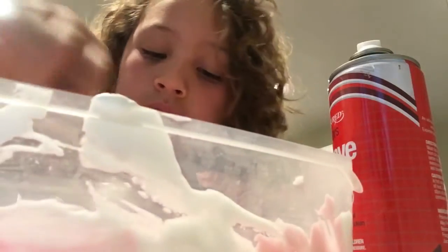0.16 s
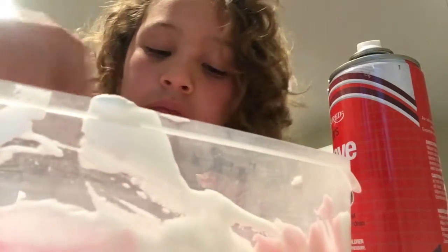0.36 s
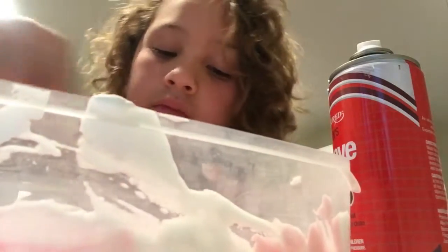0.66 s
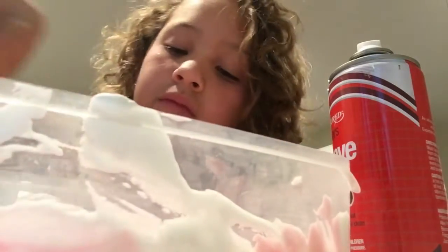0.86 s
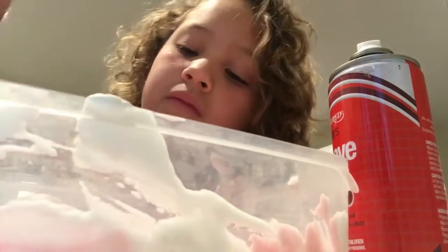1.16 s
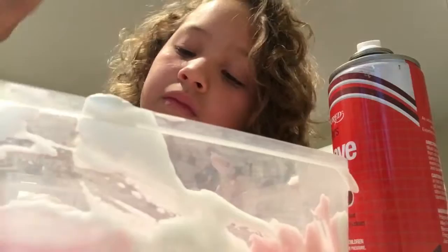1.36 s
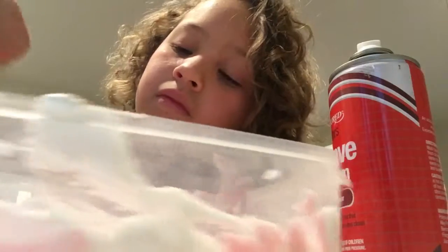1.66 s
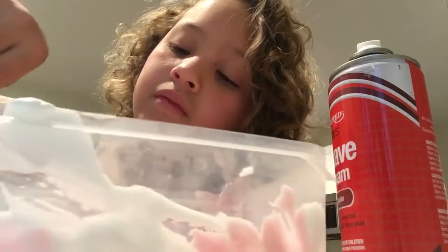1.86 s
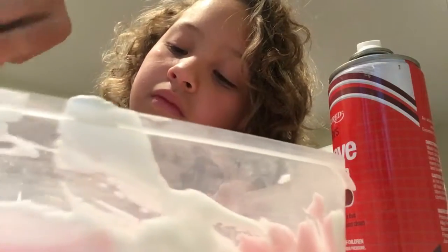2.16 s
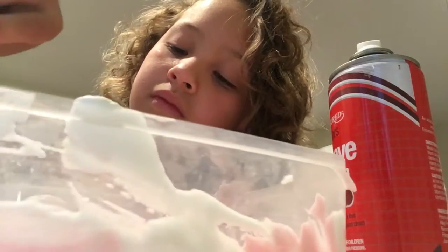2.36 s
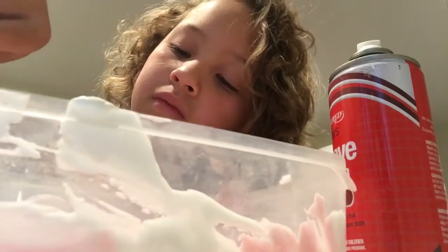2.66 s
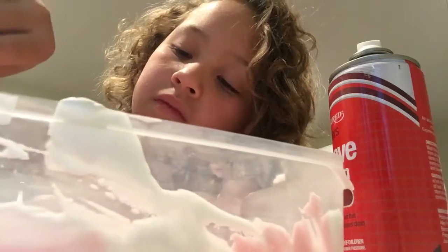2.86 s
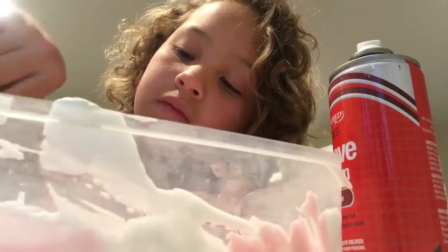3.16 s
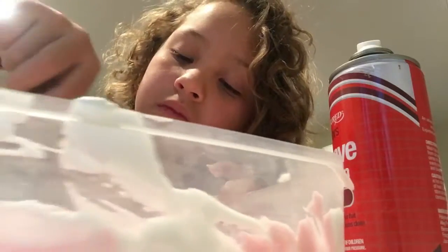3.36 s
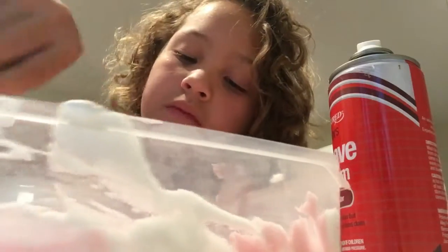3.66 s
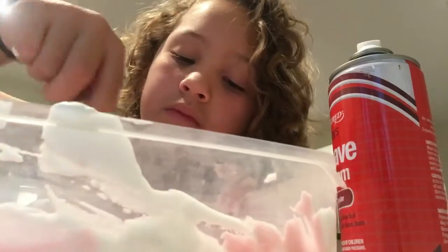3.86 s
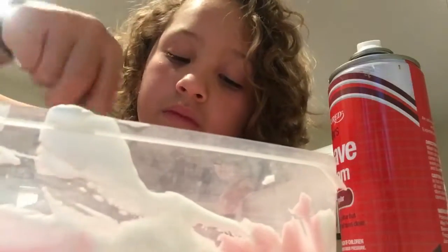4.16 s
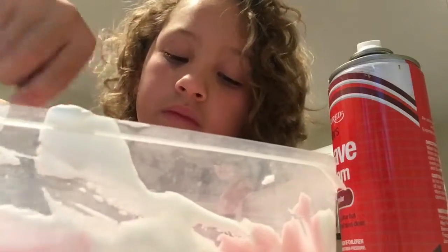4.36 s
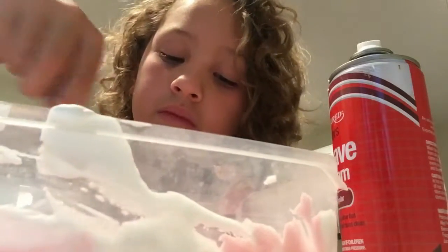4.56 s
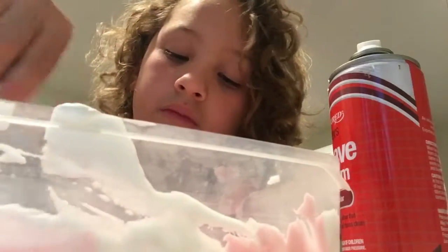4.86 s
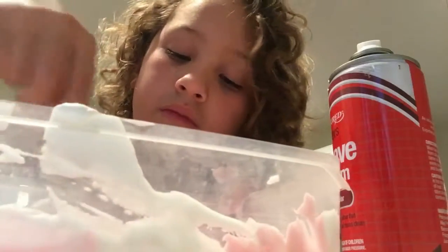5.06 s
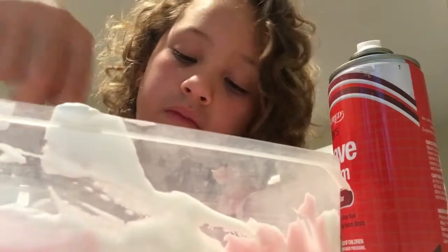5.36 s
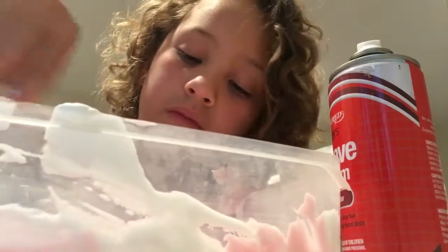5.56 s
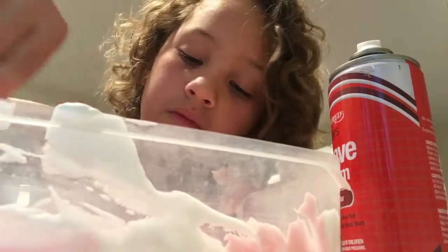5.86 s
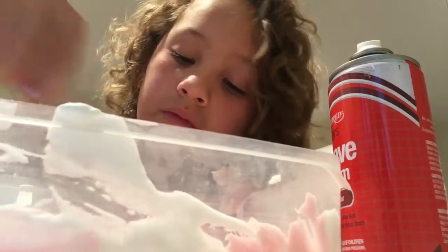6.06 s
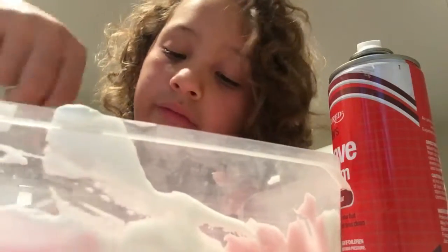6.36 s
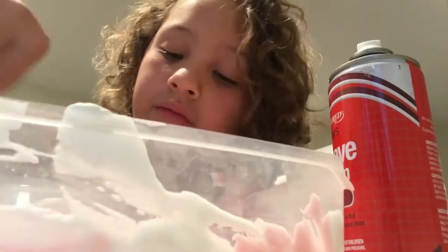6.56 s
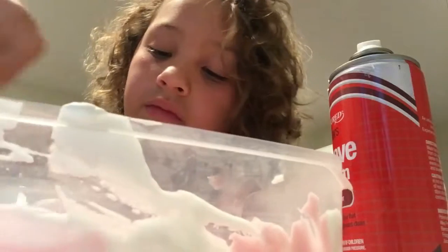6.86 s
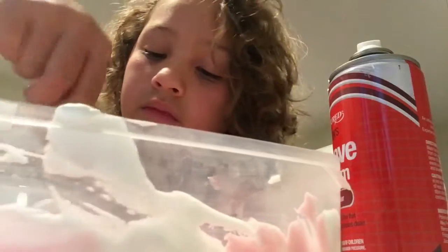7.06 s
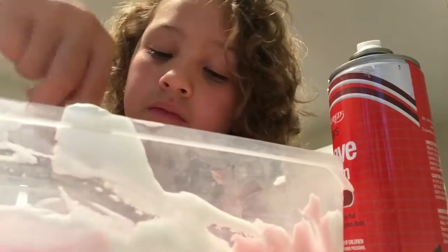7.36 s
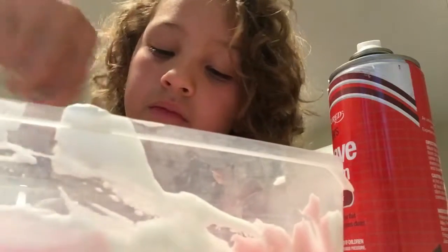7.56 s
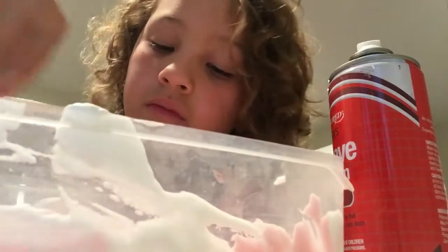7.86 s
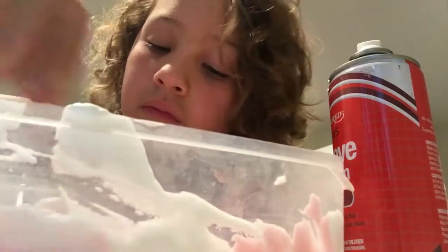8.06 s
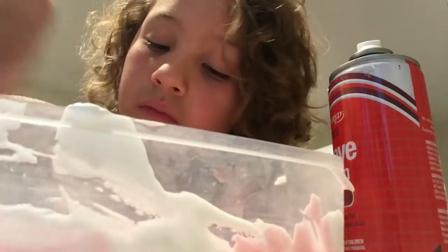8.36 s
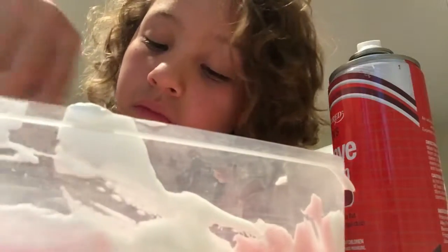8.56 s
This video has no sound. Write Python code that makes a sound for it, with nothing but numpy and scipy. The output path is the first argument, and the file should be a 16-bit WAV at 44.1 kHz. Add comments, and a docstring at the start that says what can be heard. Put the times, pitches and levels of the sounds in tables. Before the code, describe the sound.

A hard tool stirs sticky paste in a plastic tub, with irregular close taps, hollow knocks and small clicks.

```python
"""At a table in a small room, a hard tool stirs sticky paste in a plastic tub, right beside a phone. The tool
knocks and drags on the tub, whose walls, base and rim ring briefly while the table thumps. The paste ticks as
it tears. Behind it all are a low rumble of the room and a hiss that swells after hard blows."""
import sys
import numpy as np
from scipy import signal
from scipy.fft import rfft, irfft
from scipy.io import wavfile
from scipy.ndimage import uniform_filter1d

SR = 44100
rng = np.random.default_rng(int(sys.argv[2]) if len(sys.argv) > 2 else 0)


def int16_out(signal):
    """Quantize to a 16-bit WAV file."""
    q = np.round(np.clip(np.atleast_2d(signal).T, -1, 1) * 32767)
    wavfile.write(sys.argv[1], SR, q.astype(np.int16))


N = 383650

# Blows on the tub. Each row: start in seconds, peak of the wall in dB, table thump and edge ring
# in dB compared with the wall, favoured wall pitch in Hz.
BLOWS = [(0.052, -26, -17, -5, 516), (0.276, -13.5, -8, -13, 560), (0.365, -31.5, -17, -11.5, 595),
         (0.578, -24.5, -7.5, -14.5, 690), (0.653, -38.5, -5.5, -12, 630), (0.727, -33.5, -26, -12, 729),
         (0.912, -19.5, -15, -23.5, 490), (1.006, -23, -14, -27, 590), (1.036, -20.5, -22, -13, 704),
         (1.055, -30.5, -8, -29, 785), (1.198, -19, 3.5, -1.5, 560), (1.583, -3.5, -18.5, -30.5, 475),
         (1.637, -27.5, -16, -16.5, 640), (1.729, -25, -27, -28.5, 610), (2.528, -19.5, -7.5, -5.5, 510),
         (3.2, -20.5, -5.5, -30, 647), (3.482, -33.5, -3, -31, 586), (3.507, -22, -19, -31, 705),
         (3.651, -0.5, -19.5, -14.5, 660), (4.004, -21, -41, -25, 890), (4.097, -39.5, 4.5, -12, 690),
         (4.126, -30, -7, -15, 600), (4.153, -28.5, -10, -31, 580), (4.311, -27.5, -28, -0.5, 715),
         (4.329, -29.5, -35, -8, 805), (4.412, -34, -2.5, -20, 670), (4.522, -23.5, -2, -18, 554),
         (4.616, -27.5, -12, -19, 640), (4.665, -34, -16, -16, 587), (4.749, -28, -25, -10.5, 600),
         (4.782, -38, -1, -8.5, 487), (4.801, -26, 0, -13, 603), (4.84, -32.5, -7, -18, 585),
         (4.893, -31.5, -31, -11.5, 825), (4.915, -27.5, -25, -16, 613), (4.935, -20.5, -15.5, -5.5, 860),
         (5.057, -29, 3, -16.5, 520), (5.247, -25.5, -3, -15, 706), (5.359, -38.5, -4, -20, 676),
         (5.392, -31.5, -2.5, -21, 614), (5.433, -23, -12.5, -17.5, 597), (5.497, -24, -28, -4.5, 590),
         (5.564, -19, -8.5, -14.5, 490), (5.688, -28.5, -1, -15.5, 586), (5.764, -33, -22, -22, 590),
         (5.873, -29, -3.5, -13, 594), (6.043, -32, -1, -11.5, 505), (6.232, -12, -7.5, 3, 650),
         (6.25, -3, -15.5, -2.5, 560), (6.42, -31, 0, -15, 613), (6.478, -33.5, -7, -11.5, 600),
         (6.6, -18.5, -3.5, -3.5, 713), (6.771, -38.5, -2.5, -14, 640), (6.885, -4, -12.5, -3.5, 660),
         (7.205, -29.5, -37, -3.5, 617), (7.265, -29, -13, -10.5, 630), (7.416, -27, -15, -17, 556),
         (7.497, -29.5, -38, -5, 590), (7.578, -22.5, -8, -13, 784), (7.65, -25, -21, -9, 689),
         (7.667, -15, -7.5, -19, 630), (7.757, -30.5, -12, -27, 647), (7.781, -24.5, -39.5, -11.5, 617),
         (7.887, -33, -15, -23, 660), (7.997, -29, 1.5, -19.5, 630), (8.054, -19, -12.5, -22, 583),
         (8.131, -27, -32, -11.5, 640), (8.235, -32, -15.5, -16, 610), (8.357, -28.5, -6.5, -18.5, 597),
         (8.485, -29, -16, -26, 450)]
# The tones each part of the tub rings with. Each row: pitch in Hz, level in dB, seconds to fade 60 dB.
BASE_TONES = [(225.8, -4.5, 0.038), (278.4, -6, 0.027), (325, 1.5, 0.029), (368.2, -8.5, 0.04)]
WALL_TONES = [(472, 6.5, 0.0094), (527, -5, 0.043), (583, -7, 0.021), (603.3, 4, 0.025), (645, 4.5, 0.027),
              (726, -2, 0.029), (784, -2.5, 0.048)]
CORNER_TONES = [(860, -7.5, 0.031), (1003, -9.5, 0.028), (1073, -13, 0.043), (1380, -22.5, 0.0016)]
RIM_TONES = [(1588, 1.5, 0.037), (1672, 11.5, 0.02), (1970, 7, 0.016), (2270, -8.5, 0.002),
             (2454, 3, 0.019), (2638, -8.5, 0.034)]


def undb(db):
    """Turns decibels into a gain."""
    return 10 ** (np.asarray(db) / 20)


def band(x, hz, octaves):
    """Keeps a band of pitches around hz."""
    edges = np.clip(hz * 2 ** (np.array([-octaves, octaves]) / 2), 20, .45 * SR)
    return signal.sosfilt(signal.butter(2, edges, "band", fs=SR, output="sos"), x)


def coloured(points):
    """Noise of strength 1, shaped by (Hz, dB) points."""
    hz, db = np.transpose(points)
    log_hz = np.log(np.arange(1, N // 2 + 2) * SR / N)
    shape = undb(np.interp(log_hz, np.log(hz), db))
    noise = irfft(rfft(rng.standard_normal(N)) * shape, N)
    return noise / np.sqrt(np.mean(noise ** 2))


def wander(rate):
    """Glides to a new random value, rate times a second."""
    hold = int(SR / rate)
    steps = np.repeat(rng.standard_normal(N // hold + 1), hold)
    return uniform_filter1d(uniform_filter1d(steps, hold), hold)[:N]


def add(out, start_s, x):
    """Mixes x into out from start_s on."""
    i = int(start_s * SR)
    out[i:i + len(x)] += x[:N - i]


def spans(rows, fade_s):
    """A gain that is up from the start to the end of each row."""
    gain = np.zeros(N)
    for start, end, db in rows:
        gain[int(start * SR):int(end * SR)] += undb(db)
    return uniform_filter1d(gain, int(fade_s * SR))


def blows_per_s(window_s):
    """How thick the blows come, averaged over window_s."""
    blows = np.zeros(N)
    blows[(np.transpose(BLOWS)[0] * SR).astype(int)] = SR
    return uniform_filter1d(blows, int(window_s * SR))


def rumble(level_db=-49, waver_db=1.46):
    """The low, gently wavering rumble of the room."""
    # Each row: pitch in Hz, relative level in dB.
    colour = [(15, -41), (40, -10.5), (65, -3.5), (124, 5.5), (183, -10), (310, -10.5), (670, -13),
              (1070, -23.5), (1310, -42.5), (1650, -31.5), (3200, -40.5), (4200, -90)]
    return undb(level_db + waver_db * wander(4.4)) * coloured(colour)


def hiss(steady_db=-73, busy_db=-104, hard_blow_db=-6, flicker_db=3):
    """Steady hiss, plus a flickering rise after hard blows and while the paste is worked."""
    # Each row: pitch in Hz, relative level in dB.
    colour = [(900, -29.5), (1400, 8.5), (1620, 10), (2050, 0), (2600, 4), (3400, -4), (6000, -4.5),
              (10000, -8), (15000, -3.5)]
    # Swells as the paste is worked. Each row: start and end in seconds, level in dB.
    swells = [(0, .07, -65), (.14, .2, -64), (.86, .96, -76), (1.0, 1.14, -70.5), (2.78, 3.04, -72),
              (3.36, 3.52, -67), (7.45, 7.68, -75), (8.1, 8.21, -77), (8.55, 8.7, -78)]
    # Two overlapping swells follow a hard blow. Each row: length in seconds, level in dB.
    steps = [(0.409, -68), (.62, -79)]
    hard_starts = [start for start, wall_db, *_ in BLOWS if wall_db > hard_blow_db]
    after = [(start, start + length, db) for start in hard_starts for length, db in steps]
    rise = spans(swells + after, fade_s=.025) + undb(busy_db) * blows_per_s(0.14)
    flicker = undb(flicker_db * wander(70))
    return (undb(steady_db) + rise * flicker) * coloured(colour)


def room_echo(x, onset_s=0.00082):
    """The echo of a small room; each band of pitches fades at its own speed."""
    # Each row: centre pitch in Hz, seconds to fade 60 dB, relative level in dB.
    bands = [(100, 0.72, -24.5), (286, 0.14, -8.5), (770, 0.34, -12.5), (1240, 0.73, -23), (2620, 0.24, -7),
             (8000, 0.13, 1.5)]
    t = np.arange(int(.6 * SR)) / SR
    tail = sum(undb(db - 60 * t / fade_s) * band(rng.standard_normal(len(t)), hz, 1.8) / np.sqrt(hz)
               for hz, fade_s, db in bands)
    return signal.fftconvolve(x, tail * np.minimum(t / onset_s, 1))[:N]


def ring(tones, place, detune=0.041, scatter_db=4, swell_cycles=0.95):
    """One struck part rings, with peak 1; the random place of the blow shifts each of its tones."""
    hz, db, fade_s = np.transpose(tones)[:, :, None]
    pitch_shift, level_shift, phase = place[:, :len(tones), None]
    t = np.arange(int(1.2 * fade_s.max() * SR)) / SR
    hz = hz * (1 + detune * pitch_shift)
    swell = 1 - np.exp(-(t * hz / swell_cycles) ** 2)  # low tones build up later
    fade = undb(db + scatter_db * level_shift - 60 * t / fade_s)
    sound = np.sum(fade * swell * np.sin(2 * np.pi * hz * t + phase), axis=0)
    return sound / np.abs(sound).max()


def stirring(touch_db=-52, crackle_db=-82, pop_db=-44, burst_s=0.0012, spread_db=0.5):
    """Faint touches on the tub, paste crackle that grows where blows come thick, and lower pops."""
    def pulses(per_s):
        hits = rng.random(N) < per_s / SR
        return hits * undb(spread_db * np.minimum(rng.exponential(size=N), 3))
    touches = signal.fftconvolve(pulses(14), ring(BASE_TONES + WALL_TONES, rng.standard_normal((3, 12))))
    tears = pulses(60) * blows_per_s(0.29)
    bursts = signal.lfilter([1], [1, -np.exp(-1 / (burst_s * SR))], tears)  # each pulse dies away
    crackle = band(bursts * rng.standard_normal(N), hz=6500, octaves=1.44)
    pops = band(pulses(25), hz=2200, octaves=0.52)
    return undb(touch_db) * touches[:N] + undb(crackle_db) * crackle + undb(pop_db) * pops


def drags(slips_per_s=350, spread_db=4.5, wall_db=-3.0, rim_db=-11, fizz_db=-6):
    """The tool sticks and slips along the wall; the uneven slips fizz and ring wall, corner and rim."""
    # Each row: start and end in seconds, level in dB.
    strokes = [(1.003, 1.07, -40.5), (3.11, 3.19, -50), (3.37, 3.42, -50), (3.48, 3.525, -42),
               (3.995, 4.015, -31.5), (4.1, 4.16, -50.5), (4.93, 4.955, -33), (5.33, 5.38, -50),
               (7.575, 7.6, -37.5)]
    slips = (rng.random(N) < slips_per_s / SR) * undb(spread_db * rng.standard_normal(N))
    slips *= np.sign(rng.random(N) - .5)
    slips *= spans(strokes, fade_s=0.002) / np.sqrt(slips_per_s / 500)
    wall_place, rim_place = rng.standard_normal((2, 3, 12))
    tub = undb(wall_db) * ring(WALL_TONES + CORNER_TONES, wall_place)
    tub[:800] += undb(rim_db) * ring(RIM_TONES, rim_place)[:800]
    return signal.fftconvolve(slips, tub)[:N] + undb(fizz_db) * band(slips, hz=5000, octaves=2.5)


def ticks(decay_s=0.0011):
    """The tool tip and the tearing paste make short, bright cracks."""
    # Each row: start in seconds, peak in dB, centre pitch in Hz.
    cracks = [(0.053, -43.5, 4350), (0.1446, -45.5, 7360), (0.2762, -31, 5640), (0.3645, -41, 6450),
              (0.4043, -39.5, 9600), (0.5755, -38, 8450), (0.654, -41.5, 9140), (1.5848, -44, 5800),
              (3.6502, -20, 5730), (3.9538, -34.5, 8000), (3.976, -39, 5760), (3.995, -45, 7500),
              (4.1907, -43.5, 7300), (4.296, -30.5, 9300), (4.312, -38, 6000), (4.04, -47, 7500),
              (4.6226, -37, 8260), (4.892, -42, 7150), (5.311, -45.5, 6200), (5.4963, -27.5, 5230),
              (5.9244, -46.5, 5960), (6.2322, -23, 7600), (6.8862, -18, 6200), (7.159, -43, 6800),
              (7.202, -26.5, 4350), (7.494, -29.5, 5070), (7.579, -40, 6900), (7.779, -40.5, 5050),
              (8.105, -38.5, 7060), (8.1296, -35.5, 4430), (8.627, -47, 7000)]
    out = np.zeros(N)
    t = np.arange(600) / SR
    for start, db, hz in cracks:
        crack = band(rng.standard_normal(len(t)) * np.exp(-t / decay_s), hz, octaves=1.96)
        add(out, start, crack / np.abs(crack).max() * undb(db))
    return out


def favour(tones, hz, loss_db):
    """Weakens tones far from hz; one an octave away loses loss_db."""
    return [(pitch, db - loss_db * np.log2(pitch / hz) ** 2, fade_s) for pitch, db, fade_s in tones]


def knocks(clack_db=-17.5, clack_s=0.0023):
    """Each blow of the tool clacks, rings every part of the tub and thumps the table."""
    # The table's low tones. Each row: pitch in Hz, level in dB, seconds to fade 60 dB.
    table_tones = [(71.6, -3.5, 0.46), (87.5, 2, 0.13), (138, 2, 0.1)]
    out = np.zeros(N)
    places = rng.standard_normal((len(BLOWS), 5, 3, 10))
    bursts = rng.standard_normal((len(BLOWS), 900)) * np.exp(-np.arange(900) / SR / clack_s)
    clacks = band(bursts, hz=2260, octaves=1.45)
    for (start, wall_db, thump_db, edge_db, hz), part_places, clack in zip(BLOWS, places, clacks):
        # Each part: its tones, its level in dB compared with the wall.
        parts = [(favour(table_tones, .16 * hz, loss_db=29.5), thump_db),  # pitch follows the wall
                 (BASE_TONES, 1.5 + 0.67 * thump_db),
                 (favour(WALL_TONES, hz, loss_db=45), 0),
                 (CORNER_TONES, edge_db + 1.5 + 0.51 * thump_db),  # heavy thumps favour the corner
                 (RIM_TONES, edge_db - 3.17)]
        for (tones, db), place in zip(parts, part_places):
            add(out, start, ring(tones, place) * undb(wall_db + db))
        add(out, start, clack / np.abs(clack).max() * undb(wall_db + edge_db + clack_db))
    return out


def scene():
    """Tub and paste, their echo, the room's rumble and the hiss, in mono."""
    near = knocks() + ticks() + drags() + stirring()
    return (near + room_echo(near) + rumble() + hiss())[None]


def record(dry, top_hz=16100):
    """The phone loses the deepest bass, dulls the treble, clips anything too loud and cuts the top."""
    mic = signal.sosfilt(signal.butter(2, [48, 11500], "band", fs=SR, output="sos"), dry)
    clipped = np.clip(mic, -.98, .98)
    return signal.sosfilt(signal.ellip(8, .2, 70, top_hz, fs=SR, output="sos"), clipped)


dry = scene()
out = record(dry)
int16_out(out)
```